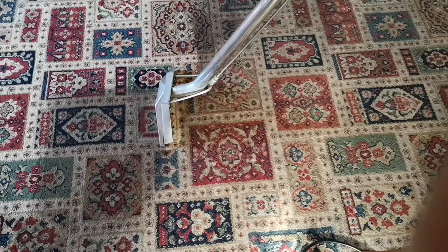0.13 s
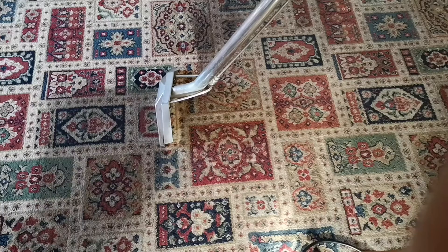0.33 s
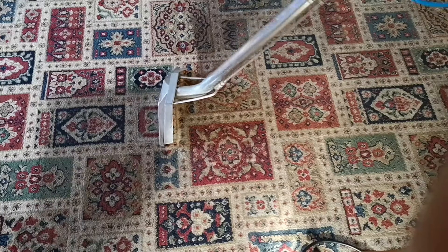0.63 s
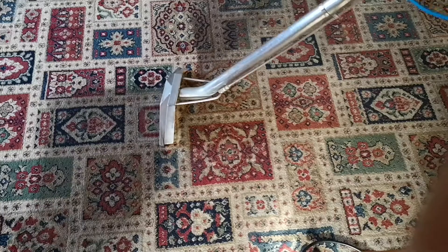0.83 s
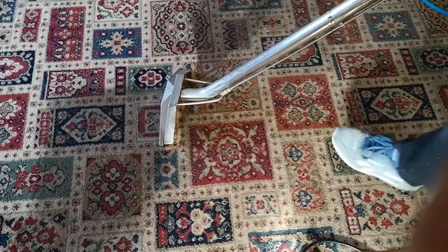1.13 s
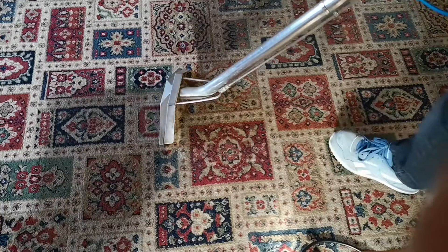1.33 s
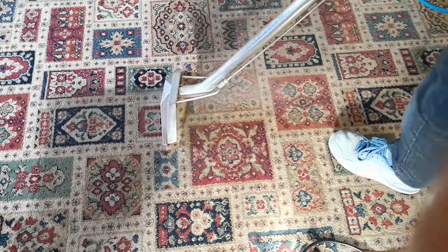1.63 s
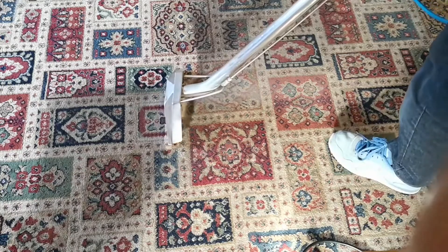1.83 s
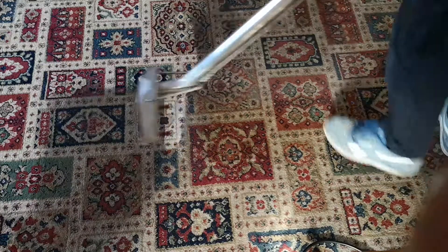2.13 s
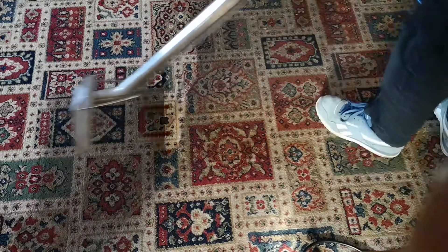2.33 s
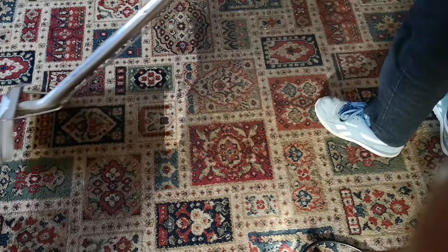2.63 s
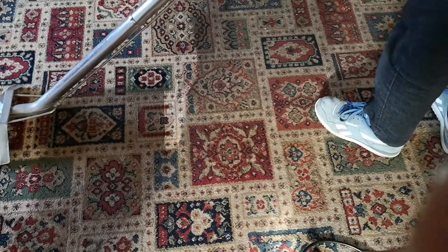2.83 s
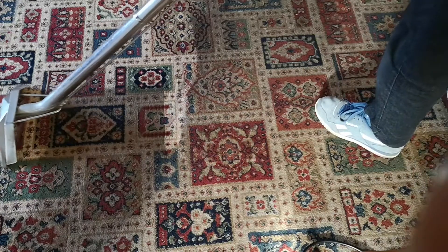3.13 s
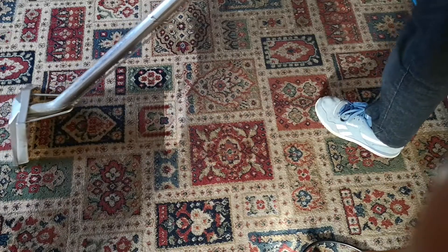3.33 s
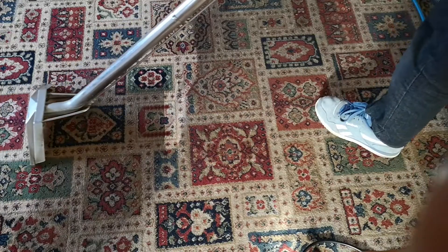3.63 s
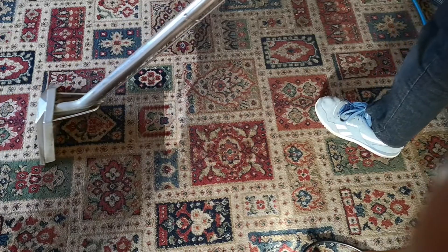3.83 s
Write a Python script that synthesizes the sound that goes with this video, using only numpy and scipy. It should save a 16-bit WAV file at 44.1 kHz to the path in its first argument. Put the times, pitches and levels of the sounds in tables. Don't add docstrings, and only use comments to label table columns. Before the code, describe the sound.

A carpet cleaner's suction roars steadily indoors, with motor whine, pump throb and hissing spray.

```python
import sys
import numpy as np
from scipy import signal
from scipy.fft import rfft, irfft
from scipy.io import wavfile
from scipy.ndimage import uniform_filter1d

SR = 44100
rng = np.random.default_rng(int(sys.argv[2]) if len(sys.argv) > 2 else 0)


def nominal_scale(level):
    x = np.asarray(level, float) / 20
    return 10 ** x


def put_to_file(sound):
    columns = np.atleast_2d(sound).T
    safe = np.clip(columns, -1, 1)
    whole_steps = np.round(safe * 32767)
    wavfile.write(sys.argv[1], SR, whole_steps.astype(np.int16))


N = 176400
HZ = np.fft.rfftfreq(2048, 1 / SR)
LEAD_S = 0.00055

# frequency [Hz], likeness [0-1].
SAME = [(30, 0.93), (150, 1), (300, 0.43), (650, 0.34), (1300, 0.18), (3000, 0.33), (7000, 0.11),
        (14000, 0.56)]
# frequency [Hz], share of LEAD_S [ratio].
LEAD = [(30, 0), (280, -1.46), (450, 1.46), (700, 1.04), (1200, 1.133), (14000, 0.927)]


def evened(x):
    return x / np.sqrt(np.mean(x ** 2) + 1e-20)


def read(points, hz):
    f, value = np.transpose(points)
    return np.interp(np.log(hz + 1), np.log(f + 1), value)


def drift(rate_hz):
    z = rfft(rng.standard_normal(N))
    smooth = np.exp(-(np.fft.rfftfreq(N, 1 / SR) / rate_hz) ** 2)
    return evened(irfft(z * smooth, N))


def lead_phase():
    return 2 * np.pi * HZ * LEAD_S * read(LEAD, HZ)


def air(db, same, left_db, lead, patchy_db):
    a, b, c, d, patches = rng.standard_normal((N // 512 + 5, 1025, 5)).T
    patches = uniform_filter1d(patches, size=16, axis=0)
    patches = evened(uniform_filter1d(patches, size=7, axis=1))
    same = np.clip(same * np.ones(len(HZ)), 0, 1)[:, None]
    lag = np.exp(-1j * lead * np.ones(len(HZ)))[:, None]
    left = a + 1j * b
    right = same * left * lag + np.sqrt(1 - same ** 2) * (c + 1j * d)
    side = nominal_scale(left_db * np.ones(len(HZ)) / 2)[:, None]
    z = np.array([left * side, right / side]) * nominal_scale(db[:, None] + patchy_db * patches)
    return evened(signal.istft(z, nperseg=2048, noverlap=1536)[1][:, :N])


def suction():
    # frequency [Hz], density [dB per Hz].
    bare_roar = [(20, -38), (48, -19), (95, -12), (290, -8.5), (700, -11.5), (2500, -21.5), (8800, -33),
                 (14500, -76.5)]
    # centre [Hz], width [Hz], boost [dB].
    resonances = [(105.5, 38.5, 13.5), (145, 8.4, 3.5), (329, 55, 6.5), (405.3, 54, 10), (526, 79, 4.5),
                  (658, 174, -6.5), (944, 100, 2.5), (1275, 98, 4), (1444, 150, -1.5), (2537, 1200, 9),
                  (3340, 740, -5.5), (3490, 150, 5.5), (7790, 3200, 7.5)]
    # frequency [Hz], left over right [dB].
    left_tilt = [(60, 1), (130, 1), (290, 0.5), (630, -3), (1380, -2.5), (3010, -2.5), (6590, 4),
                 (14400, -15.5)]
    db = read(bare_roar, HZ)
    for centre_hz, width_hz, boost_db in resonances:
        db = db + boost_db / (1 + (2 * (HZ - centre_hz) / width_hz) ** 2)
    roar = air(db, read(SAME, HZ), read(left_tilt, HZ), lead_phase(), patchy_db=1.31)
    return nominal_scale(-30.5 + 0.34 * drift(1.7)) * roar


def motors(t):
    # time [s], first shaft [Hz], its level [dB],
    # level of its sixth order [dB], second motor tone [Hz], its level [dB].
    course = [(0.42, 284, -36.5, -44, 754, -44), (0.55, 282.5, -42.5, -72, 734.2, -41.5),
              (0.64, 287.8, -37, -47, 734.4, -46.5), (0.86, 284.7, -32, -58, 736, -40.5),
              (1.03, 284.6, -43.5, -46, 730, -40.5), (1.33, 284.5, -38, -46.5, 740, -57),
              (1.5, 286.2, -34.5, -42.5, 739.7, -48), (2.15, 288.5, -36, -44, 738, -41.5),
              (2.41, 287.2, -33.5, -50, 734.4, -43.5), (3.11, 285.7, -40.5, -53, 738.3, -34.5),
              (3.68, 286.2, -35.5, -42.5, 747, -46.5), (3.96, 286.8, -32, -47, 743.5, -42)]
    # multiple of first shaft, level over sixth order [dB].
    high_orders = [(12, -8.5), (3.51, -1.5)]
    # left over right [dB], then left lag [s].
    tone_pan_db = [-0.5, -7, -7.5]
    tone_lag_s = [.0001, 0.00047, 0.00062]
    shaft, sixth, second = 0, 1, 2
    times, *columns = np.transpose(course)
    hz1, db1, db6, hz2, db2 = (np.interp(t, times, column) for column in columns)
    hz1 = hz1 * (1 + 0.0012 * drift(8.3))
    hz2 = hz2 * (1 + 0.00086 * drift(10.2))
    tones = [(hz1, db1, shaft), (6 * hz1, db6, sixth), (hz2, db2, second)]
    tones += [(6.07 * hz2, db2 - 19.5, second)]
    tones += [(multiple * hz1, db6 + over_db, sixth) for multiple, over_db in high_orders]
    tones += [(29.2 + 0 * t, -50.5, shaft)]
    out = 0
    for hz, db, place in tones:
        turn = 2 * np.pi * np.cumsum(hz) / SR
        half_pan_db = tone_pan_db[place] / 2
        left = nominal_scale(half_pan_db) * np.sin(turn - 2 * np.pi * hz * tone_lag_s[place])
        right = nominal_scale(-half_pan_db) * np.sin(turn)
        out = out + np.sqrt(2) * nominal_scale(db + 1.25 * drift(3.9)) * np.array([left, right])
    return out


def pump(t):
    # time [s], turns per second [Hz], load released [0-1].
    course = [
        (0, 29, 0.07),
        (1.55, 29.2, 0),
        (1.701, 33, 0.97),
        (2.071, 35, 1),
        (2.129, 29, 0),
        (3.1, 28.6, 0),
        (3.22, 33.4, 0.8),
        (3.45, 33.6, 1),
        (4, 33.3, 0.97),
    ]
    # multiple of shaft, level under pressure [dB], level released [dB].
    orders = [(1, -62, -62), (2, -56, -46), (3, -37, -22), (4, -41, -35), (5, -46, -52), (6, -52, -52),
              (7, -52, -47)]
    times, shaft_hz, released = np.transpose(course)
    hz = np.interp(t, times, shaft_hz) * (1 + 0.0064 * drift(3.33))
    turn = 2 * np.pi * np.cumsum(hz) / SR
    free = np.clip(np.interp(t, times, released), 0, 1)
    waver_db = 2.6 + (1.2 - 2.6) * free
    out = 0
    for multiple, loaded_db, free_db in orders:
        db = loaded_db + (free_db - loaded_db) * free + waver_db * drift(12)
        out = out + np.sqrt(2) * nominal_scale(db) * np.sin(multiple * turn + 2 * np.pi * rng.random())
    return out


def spray(t):
    # frequency [Hz], level [dB].
    jet = [(900, -44), (2000, 2), (3000, -3.5), (5000, -5.5), (6300, -4), (7700, 2), (10600, -15.5),
           (14500, -18)]
    # open [s], rise [s], close [s], level at start [dB],
    # level at end [dB], left over right [dB].
    pulls = [
        (1.412, 0.011, 2.026, -38.5, -33, 4.5),
        (2.96, 0.018, 8.8, -41, -41.5, 8.5),
        (0.56, 0.013, 0.786, -44.5, -43, 2.5),
        (3.04, 0.022, 3.2, -40, -36.5, 9),
    ]
    hiss = air(read(jet, HZ), 0.35, 0, 2 * np.pi * HZ * LEAD_S, patchy_db=0.9)
    hiss = hiss * nominal_scale(0.77 * drift(22))
    out = 0
    for on, rise, off, start_db, end_db, pan_db in pulls:
        closing = np.exp(-np.maximum(t - off, 0) / 0.027)
        shape = np.clip((t - on) / rise, 0, 1) * closing
        loudness = nominal_scale(np.interp(t, [on, off], [start_db, end_db]))
        out = out + shape * loudness * nominal_scale([[pan_db / 2], [-pan_db / 2]])
    return out * hiss


def gulps(t):
    # start [s], rise [s], fall [s], level [dB], centre [Hz], width [Hz].
    rushes = [(0.353, 0.024, 0.45, -34.5, 1700, 2300), (0.382, .03, 0.3, -36.5, 1120, 340),
              (1.894, 0.14, 0.086, -32.5, 2300, 1900), (.1, .36, 0.6, -33.5, 366, 135),
              (1.95, 0.072, .1, -32.5, 1262, 85), (2.01, 0.1, 0.088, -35, 1384, 120),
              (1.85, 0.2, 0.053, -33.5, 145, 21), (2.18, 0.52, .36, -37.5, 150, 36),
              (3.01, 0.12, .11, -39.5, 4000, 4300), (1.405, .015, .3, -52.5, 12000, 6000),
              (2.955, .015, .22, -53, 12000, 5000)]
    out = 0
    for start_s, rise, fall, db, centre_hz, width_hz in rushes:
        band = -20 * np.log10(1 + (2 * (HZ - centre_hz) / width_hz) ** 2)
        swell = np.clip((t - start_s) / rise, 0, 1) ** 2
        fade = np.exp(-(np.maximum(t - start_s - rise, 0) / fall) ** 2)
        rush = air(band, read(SAME, HZ), 0, lead_phase(), patchy_db=2.3)
        out = out + nominal_scale(db + 1.2 * drift(40)) * swell * fade * rush
    return out


def thinned_treble(x):
    # frequency [Hz], power to reach [dB].
    bar = [(9200, -95), (9800, -80), (10600, -78.5), (11500, -78), (14500, -78.5)]
    hz, _, z = signal.stft(x, SR, nperseg=2048, noverlap=1024)
    hz = hz[:1024]
    cells = (abs(z[:, :1024]) ** 2).mean(0).reshape(128, 8, -1).mean(1)
    level_db = 10 * np.log10(cells + 1e-20) + 3.2 * rng.standard_normal(cells.shape)
    hiss_db = 10 * np.log10(cells[42:46].mean(0) + 1e-20)
    level_db -= 0.6 * (hiss_db + 60)
    bar_db = read(bar, hz) - 99 * (hz < bar[0][0])
    stays = np.repeat(level_db, 8, axis=0) > bar_db[:, None]
    stays = np.vstack([stays, stays[-1:]])
    return signal.istft(z * stays, SR, nperseg=2048, noverlap=1024)[1][:, :N]


def scene():
    t = np.arange(N) / SR
    return suction() + motors(t) + pump(t) + spray(t) + gulps(t)


def low_pass(x):
    return signal.sosfilt(signal.butter(12, 14700, fs=SR, output="sos"), x)


def record(dry):
    start_s, cut_in_s = 0.3987, 0.0012
    opened = np.clip((np.arange(N) / SR - start_s) / cut_in_s, 0, 1)
    return low_pass(thinned_treble(dry) * opened)


dry = scene()
out = record(dry)
put_to_file(out)
```